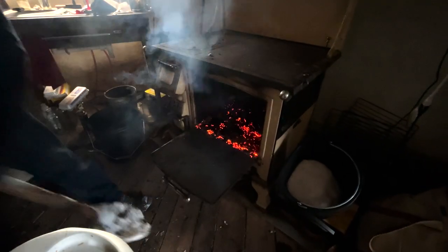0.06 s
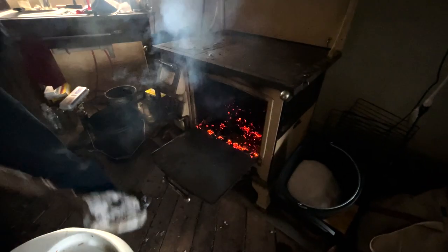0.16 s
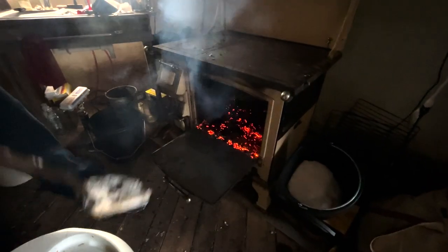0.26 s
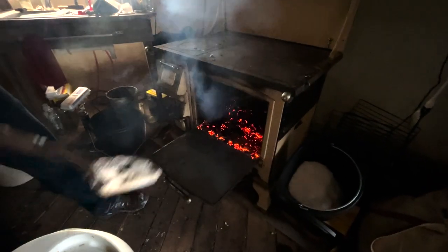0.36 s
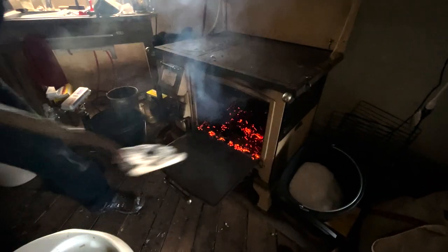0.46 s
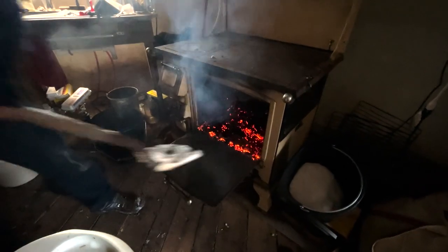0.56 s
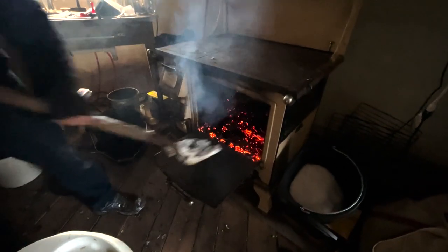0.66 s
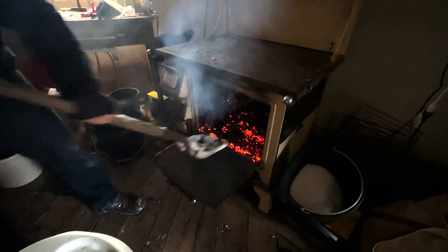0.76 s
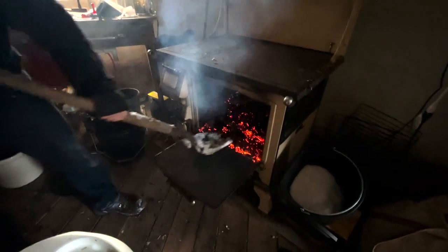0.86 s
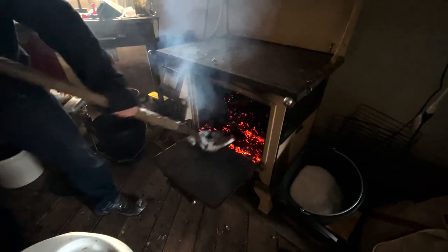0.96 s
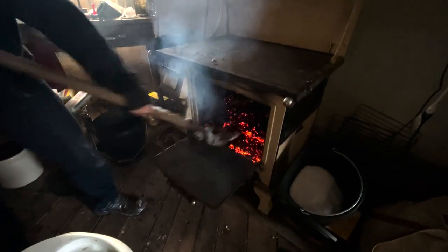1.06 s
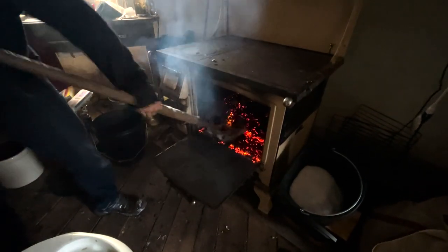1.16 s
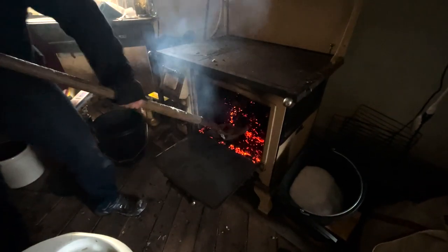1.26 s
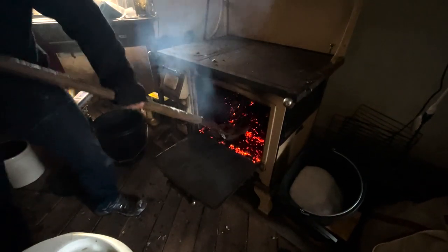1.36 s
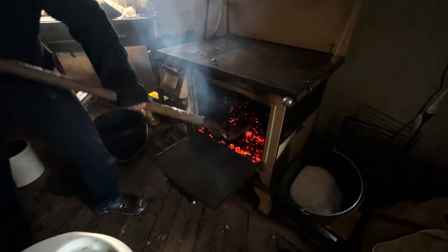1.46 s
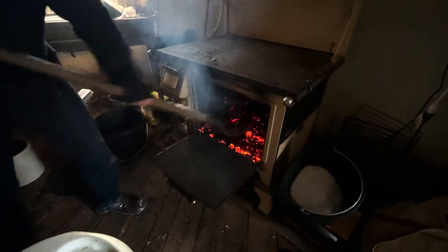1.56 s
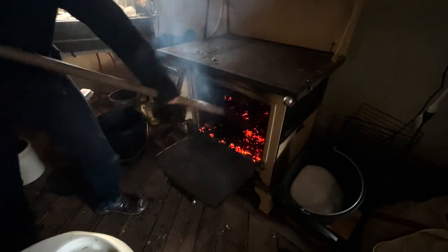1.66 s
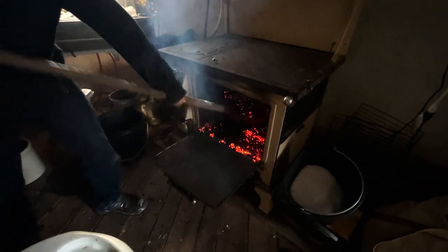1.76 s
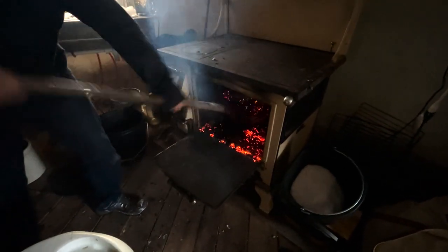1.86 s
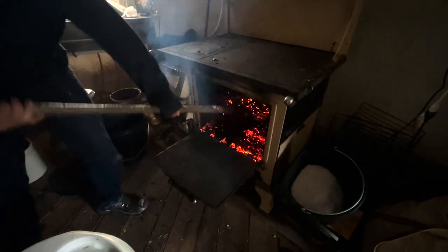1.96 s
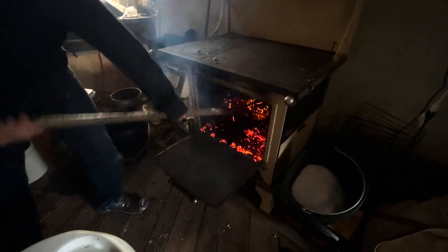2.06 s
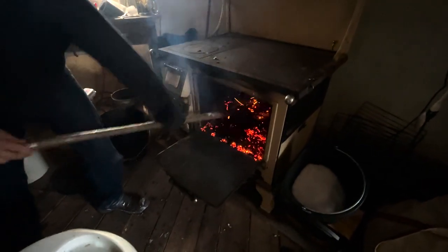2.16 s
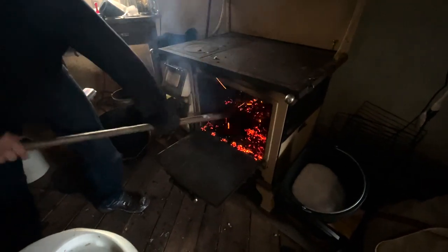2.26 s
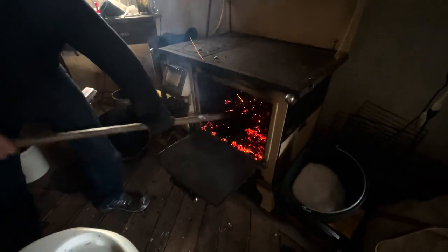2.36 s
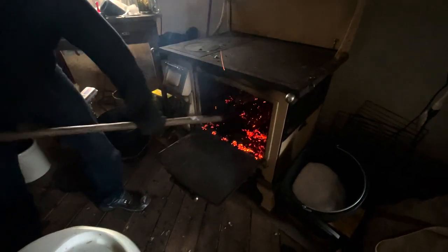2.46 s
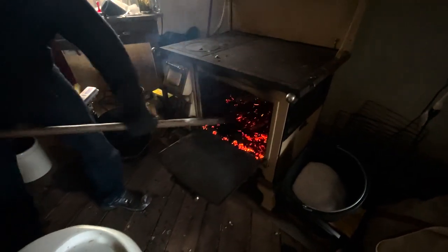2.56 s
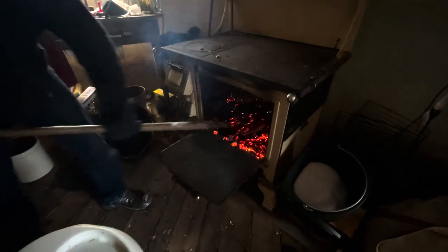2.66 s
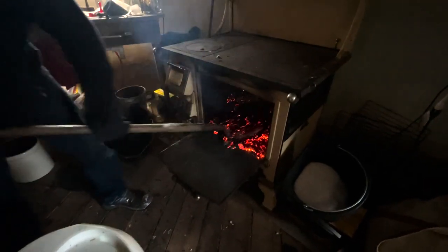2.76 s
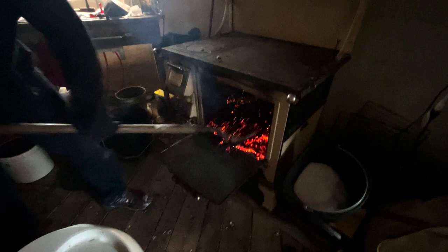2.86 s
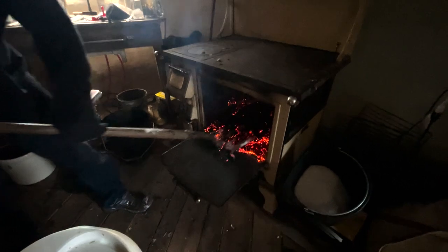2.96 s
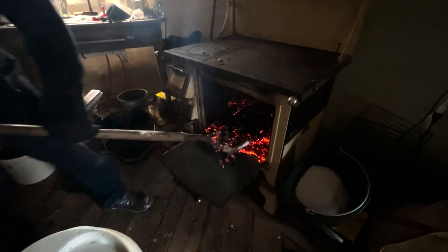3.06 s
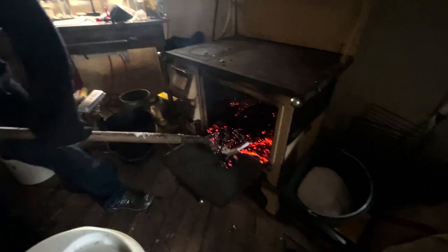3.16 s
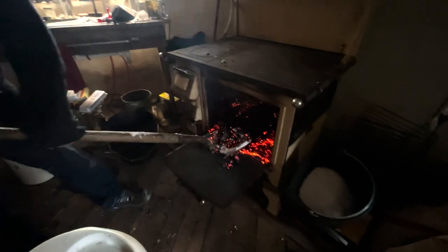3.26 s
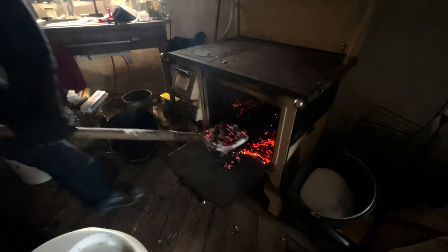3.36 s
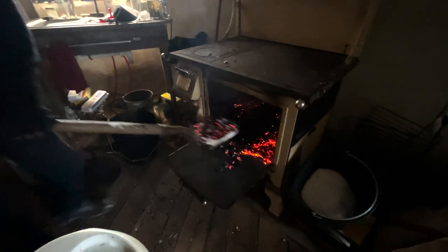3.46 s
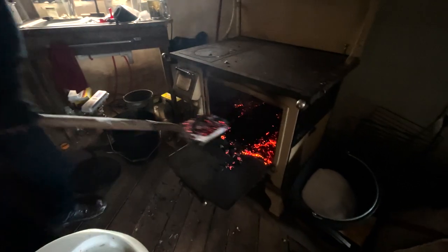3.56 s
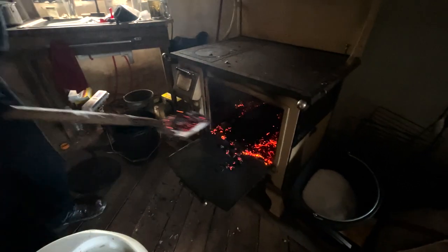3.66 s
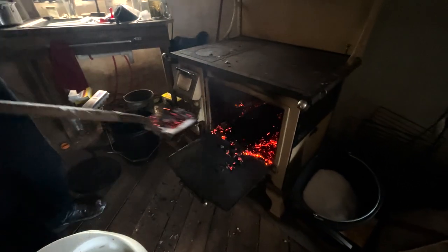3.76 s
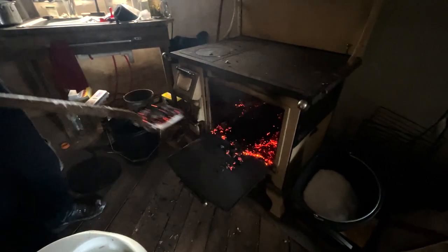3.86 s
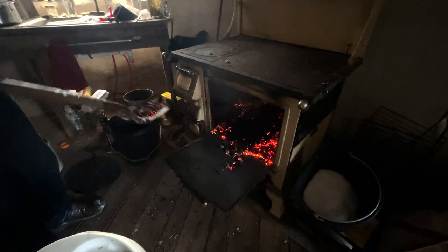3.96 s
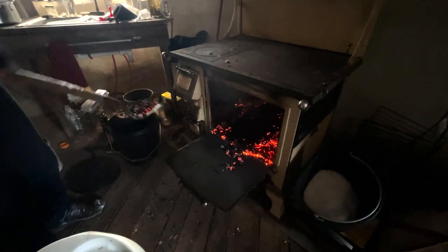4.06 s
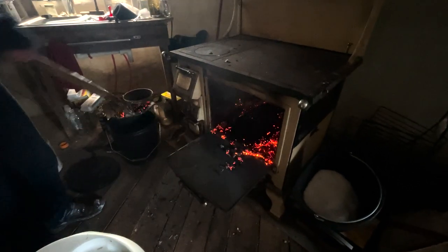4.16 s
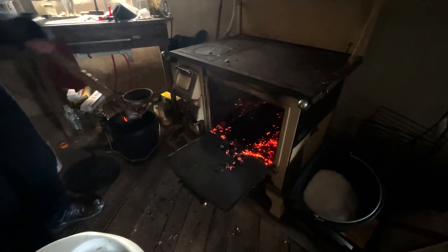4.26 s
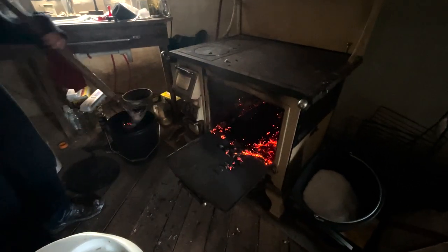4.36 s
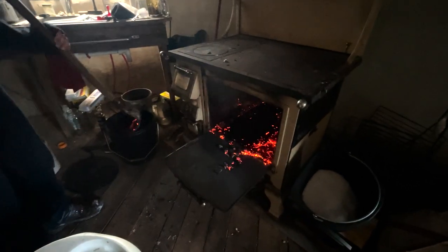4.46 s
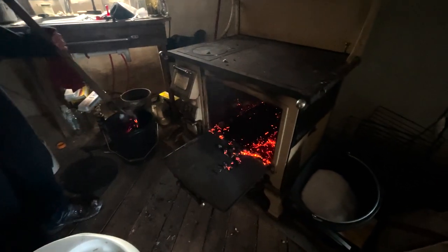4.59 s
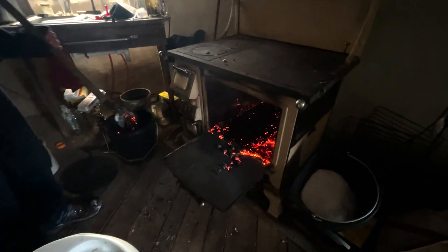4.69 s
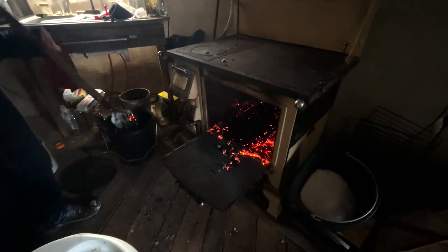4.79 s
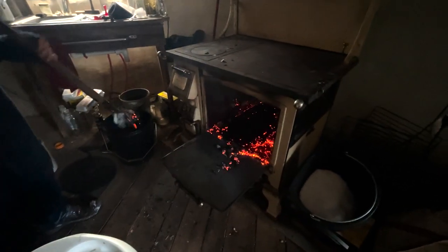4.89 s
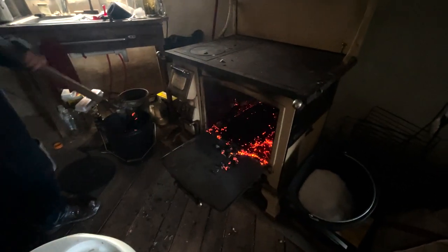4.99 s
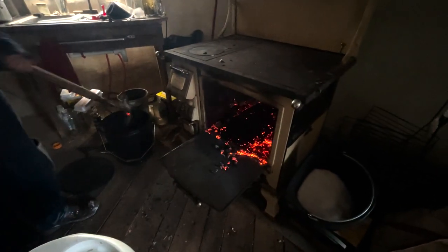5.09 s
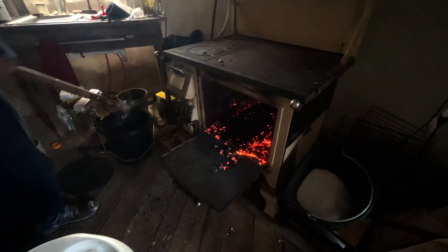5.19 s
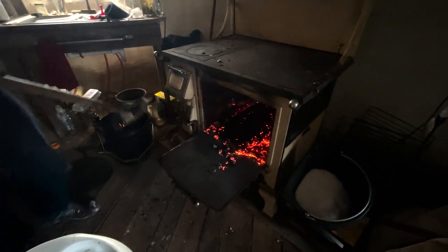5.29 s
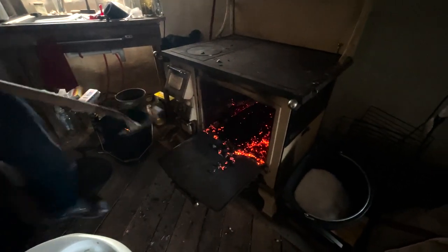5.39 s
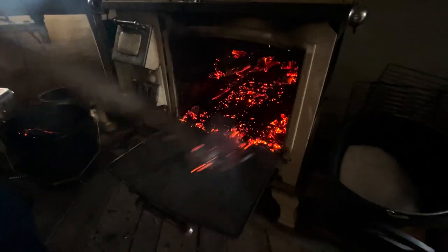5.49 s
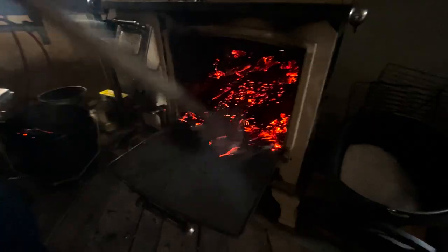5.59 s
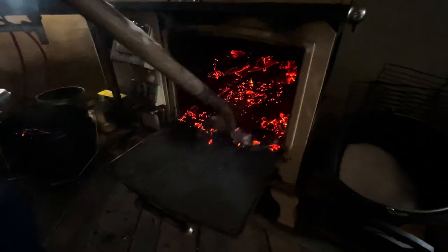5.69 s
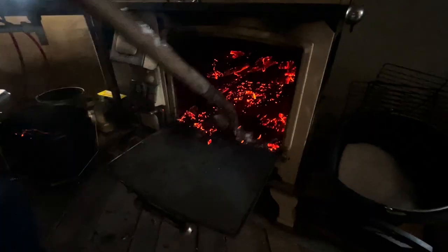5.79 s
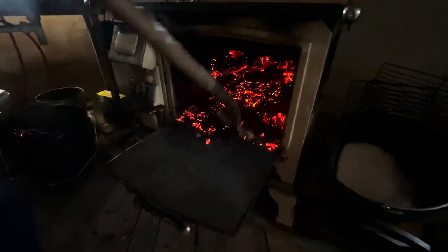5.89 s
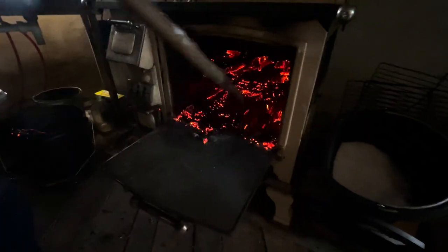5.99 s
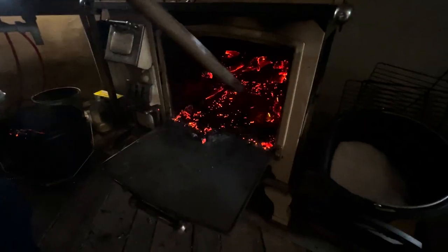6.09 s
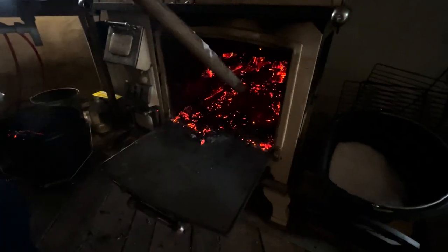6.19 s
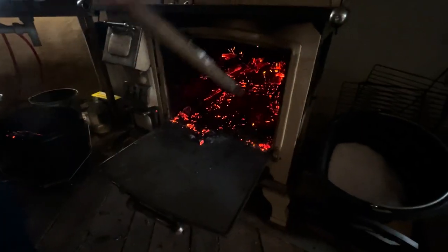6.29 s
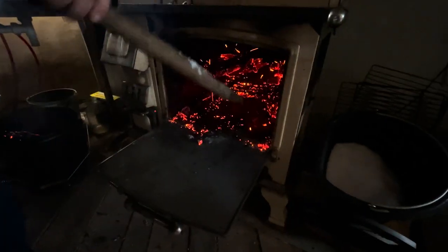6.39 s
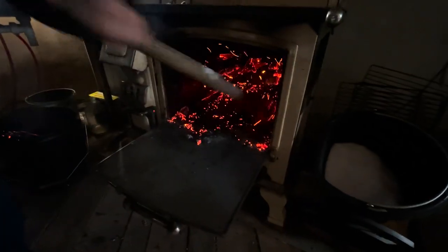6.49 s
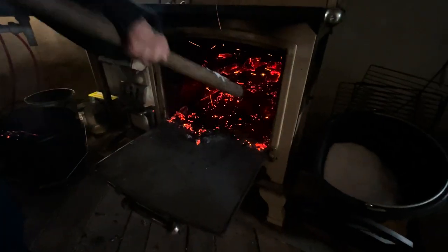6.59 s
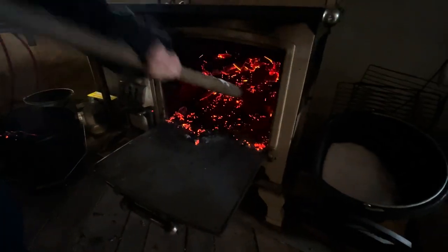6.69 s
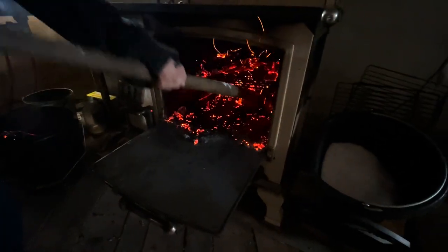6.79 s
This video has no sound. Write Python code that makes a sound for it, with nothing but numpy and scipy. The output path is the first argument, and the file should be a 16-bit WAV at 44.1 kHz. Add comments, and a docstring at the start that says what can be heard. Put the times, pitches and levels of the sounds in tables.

```python
"""A light brush and a few ember snaps, then a steel shovel scrapes over the sill of a wood stove,
digs into the burning coals and tips them into a metal bucket. Grit crunches under the blade and
rings the steel; the shovel's weight rumbles the firebox, and lumps knock and crush.
Heard from a close pair of microphone ports in a small wooden room that hums softly."""
import sys
import numpy as np
from scipy import signal
from scipy.io import wavfile

SR = 44100
rng = np.random.default_rng(int(sys.argv[2]) if len(sys.argv) > 2 else 0)


def wav_out(sig):
    """Save sig, one row per channel (or a flat mono array), as 16-bit PCM at SR to the path in sys.argv[1]."""
    wavfile.write(sys.argv[1], SR, np.round(np.clip(np.atleast_2d(sig).T, -1, 1) * 32767).astype(np.int16))


N = 301644

# Shovel strokes at the stove and bucket, one list each.
# Each row: time in seconds, scrape on the blade in dB, weight on the firebox or bucket in dB.
STROKES = [
    [(.618, -43, -34), (.64, -26.5, -39), (.69, -33.5, -34.5), (.73, -29.5, -33), (.88, -36, -42.5),
     (.97, -24.5, -30), (1.06, -27.5, -14), (1.14, -29, -34), (1.18, -25, -27.5), (1.25, -41, -39),
     (1.45, -39.5, -43.5)],
    [(1.47, -32, -46.5), (1.6, -16, -15), (1.63, -25, -26.5), (1.7, -25.5, -25), (1.74, -23, -16),
     (1.78, -26, -20.5), (1.96, -39, -28.5), (1.99, -29, -20.5), (2.05, -38.5, -24), (2.1, -42, -39),
     (2.23, -33.5, -19), (2.3, -36, -33), (2.41, -32, -29), (2.6, -39.5, -29), (2.67, -47, -44.5),
     (2.74, -41, -46)],
    [(2.76, -45.5, -46), (2.9, -35.5, -44.5), (3.07, -48.5, -49), (3.33, -53, -62)],
    [(4.367, -24, -26), (4.41, -26, -30.5), (4.45, -30.5, -28.5), (4.59, -42.5, -51), (4.63, -43, -50),
     (4.7, -33.5, -39.5), (4.76, -39, -45), (4.82, -34, -48), (4.87, -51.5, -41), (4.98, -57, -68)],
    [(5.486, -20.5, -35), (5.498, -14, -22.5), (5.52, -30, -33), (5.555, -36, -45), (5.606, -35, -25),
     (5.7, -43, -38.5), (5.86, -32, -30.5), (6.0, -24.5, -26.5), (6.06, -22.5, -16.5), (6.2, -47, -37.5),
     (6.26, -41, -30), (6.33, -45.5, -39)],
    [(6.344, -34, -12.5), (6.41, -33.5, -23.5), (6.49, -19, -15), (6.59, -33.5, -23), (6.72, -28.5, -20),
     (6.77, -47, -34), (6.84, -21, -17.5)],
]
# Shovel and boots brush lightly between strokes.
# Each row: start, rise and hold in seconds, scrape in dB, weight in dB.
BRUSHES = [(0, 0.0017, 0.11, -46.5, -57), (0.326, .05, .02, -56.5, -51), (3.385, 0.049, 0.034, -43, -51),
           (3.699, 0.012, .03, -44, -56), (4.295, 0.015, 0.082, -43.5, -57.5),
           (5.17, 0.042, 0.026, -58, -57)]
BRUSH_RISE_DB, RELEASE_DB_PER_S = 15.5, 206


def shovel_effort():
    """Scrape and weight in dB: each stroke or brush lands, runs its course and dies; the loudest rules."""
    brushes = [[(start, scrape - BRUSH_RISE_DB, weight - BRUSH_RISE_DB),
                (start + rise, scrape, weight), (start + rise + hold, scrape, weight)]
               for start, rise, hold, scrape, weight in BRUSHES]
    t, effort_db = np.arange(N) / SR, np.full((2, N), -120.)
    for move in STROKES + brushes:
        fade_db = RELEASE_DB_PER_S * np.maximum(t - move[-1][0], 0) + 200 * (t < move[0][0])
        effort_db = np.maximum(effort_db, np.array(in_time(move)) - fade_db)
    return effort_db


# Modes of the shovel blade and the bucket wall. Each row: pitch in Hz, width in Hz, level in dB.
BLADE_MODES = [(601, 54, 1.5), (700, 70, 0.5), (818, 86, 0.5), (877, 28.4, -4), (930, 46, 0.5),
               (1034, 42, 0.5), (1150, 45, -2), (1283, 46, -0.5), (1402, 330, 3.5), (1666, 157, 2),
               (1764, 157, 1.5), (1973, 17, -5.5), (2150, 130, -18.5)]
BUCKET_MODES = [(785, 95, 2), (1040, 290, 17.5), (1990, 110, 7), (2260, 52, -15), (2480, 210, 11.5),
                (3370, 61, -30), (4030, 98, -12.5), (5400, 230, 6)]


def blade_and_bucket(scrape_db, bucket_share):
    """Fine grit and knocks ring the steel blade and, by its share, the bucket."""
    knocking = knock_envelope(BLADE_DB, trim_db=-0.5, t60_scale=1)
    scrape = grains(4000, 2.57, 1.1) * (from_db(scrape_db) + knocking)
    blade = ring(scrape, BLADE_MODES, spread=0.47, wander_db=4, knock_column=BLADE_DB, knock_db=-5.5)
    bucket = ring(scrape, BUCKET_MODES, spread=0.56, wander_db=6, knock_column=BLADE_DB, knock_db=6.5)
    return (1 - bucket_share) * blade + bucket_share * bucket


# Hard blows. Each row: start in seconds, level in dB, pitch rung hardest in Hz, crack of grit in dB.
BLOWS = [(.3835, -34, 106, -64), (.6261, -24.5, 345, -37), (.7694, -17, 930, -34), (.9734, -14.5, 589, -18),
         (1.0573, -3, 222, -11), (1.5935, -3.5, 274, -29.5), (1.72, -6, 217, -14.5),
         (1.7336, -10.5, 320, -18), (1.9784, -24, 330.4, -37), (2.044, -15, 129, -45),
         (2.2074, -20, 400, -24), (2.478, -21, 385, -58), (2.5606, -17.5, 784, -27),
         (2.581, -18, 1490, -21.5), (4.3681, -10, 1990, -13), (4.4286, -11.5, 159, -47),
         (4.475, -26, 169, -47), (4.621, -25.5, 139, -43), (4.673, -25, 169, -30),
         (4.7712, -20.5, 1140, -24), (4.8492, -26.5, 400, -55), (5.5027, -7.5, 890, -22),
         (5.591, -0.5, 840, -3.5), (5.604, -10.5, 173, -40), (5.7876, -23.5, 615, -16.5),
         (6.0599, -5, 355, -37), (6.3441, -8.5, 590, -51), (6.4534, -14, 463, -23),
         (6.6485, -7.5, 336, -22), (6.793, -13.5, 340, -16), (6.8344, -6, 324, -21)]
# Coal lumps crush; embers snap, too light to move the iron.
# Each row: start in seconds, level in dB, nominal time to fall 60 dB in seconds.
COAL_CRUNCHES = [(.6988, -23.5, 0.39), (1.0169, -16, 0.089), (1.8437, -17, 0.064), (2.1197, -24, 0.096),
                 (2.405, -17, 0.038), (2.7793, -32, .18), (3.698, -35, 0.072), (4.2945, -42.5, 0.24),
                 (4.488, -28.5, 0.1), (4.546, -32.5, 0.16), (4.6264, -26.5, 0.26), (4.81, -28.5, 0.052),
                 (5.567, -15.5, 0.1), (5.748, -19.5, 0.021), (5.764, -30, 0.01), (5.889, -19.5, 0.013),
                 (5.9167, -10.5, 0.066), (5.938, -17, 0.0095), (6.6216, -20, .24)]
EMBER_SNAPS = [(0.2, -48, 0.018), (.361, -51, .05), (0.415, -42, 0.075), (.4426, -39.5, .093),
               (4.043, -37.5, 0.047), (4.123, -35.5, 0.024), (4.928, -36.5, 0.1), (4.997, -43, 0.24),
               (5.05, -50, .05), (5.225, -47.5, .04)]
CRUNCH_FIREBOX_DB, CRUNCH_BLADE_DB, CRUNCH_PITCH_HZ = -28.5, -3, 405
BLOW_T60_S, SPLIT_HZ = 0.017, 470  # lower blows land on the firebox, higher ones on the blade
BLADE_LOSS_DB_PER_OCT, FIREBOX_LOSS_DB_PER_OCT = 6.5, 15
BOOM_SPLIT_HZ, BOOM_LOSS_DB_PER_OCT = 285, 8  # knocks above this pitch stir the boom less
START_S, GRIT_DB, FIREBOX_DB, BLADE_DB, T60_S, PITCH_HZ, BOOM_DB = range(7)  # columns of knocks()


def knocks():
    """Every crunch, snap and blow, with its force shared among grit, firebox, blade and boom."""
    rows = [(start, db, db + CRUNCH_FIREBOX_DB, db + CRUNCH_BLADE_DB, t60, CRUNCH_PITCH_HZ)
            for start, db, t60 in COAL_CRUNCHES]
    rows += [(start, db, -200, -200, t60, CRUNCH_PITCH_HZ) for start, db, t60 in EMBER_SNAPS]
    for start, db, hz, crack_db in BLOWS:
        octaves = np.clip(np.log2(hz / SPLIT_HZ), -1, 2)
        firebox_db = db - FIREBOX_LOSS_DB_PER_OCT * max(octaves, 0)
        blade_db = db + BLADE_LOSS_DB_PER_OCT * min(octaves, 0)
        rows.append((start, crack_db, firebox_db, blade_db, BLOW_T60_S, hz))
    rows = np.array(rows)
    boom_loss_db = BOOM_LOSS_DB_PER_OCT * np.log2(rows[:, PITCH_HZ] / BOOM_SPLIT_HZ).clip(0)
    return np.column_stack([rows, rows[:, FIREBOX_DB] - boom_loss_db])


def knock_envelope(column, trim_db, t60_scale):
    """Each knock is a sudden force that dies away exponentially."""
    force, t = np.zeros(N), np.arange(SR // 4) / SR
    for hit in knocks():
        at = round(hit[START_S] * SR)
        t60 = np.clip(hit[T60_S] * t60_scale, .004, 1)
        force[at:at + len(t)] += from_db(hit[column] + trim_db - 60 * t / t60)[:N - at]
    return force


# The stove's firebox: the boom of its air and floor, then its iron walls.
# Each row: pitch in Hz, width in Hz, level in dB.
BOOM_MODES = [(90.2, 14, 1), (105.7, 14, -1), (150.6, 43, 6.5), (181.7, 16.4, 2.5), (216.3, 37, -2)]
IRON_WALL_MODES = [(336.8, 42.5, 1), (348.6, 31.5, 4.5), (378.5, 37, -3), (411.4, 23.6, -3),
                   (461, 54, -3.5), (574, 11.5, -14.5)]


def firebox(weight_db, boom_db, tilt_db):
    """Coarse contacts under the shovel's weight shake the heavy iron."""
    lumps = grains(700, 2.98, 2.65)
    heave = from_db(weight_db + boom_db) + knock_envelope(BOOM_DB, trim_db=-3.5, t60_scale=1.6)
    thud = from_db(weight_db) + knock_envelope(FIREBOX_DB, trim_db=-0.5, t60_scale=0.75)
    boom = ring(lumps * heave, BOOM_MODES, spread=0.051, wander_db=1.5,
                knock_column=FIREBOX_DB, knock_db=-4.5, tilt_db=tilt_db)
    walls = ring(lumps * thud, IRON_WALL_MODES, spread=0.21, wander_db=3.5,
                 knock_column=FIREBOX_DB, knock_db=-7.5)
    return boom + walls


# The colour of coal grit, close up. Each row: frequency in Hz, spectral density in dB.
GRIT_SPECTRUM = [(1060, -30), (1800, -3), (2350, -2.5), (3040, 1.5), (6360, -3.5), (7950, -9),
                 (12600, -2.5), (14000, -21)]
# Small rings in the grit. Each row: pitch in Hz, width in Hz, level in dB.
GRIT_MODES = [(3040, 220, -12), (3590, 120, -12), (4150, 140, -12), (4540, 130, -13), (5070, 130, -14),
              (5990, 130, -16)]


def grit(grit_db, tilt_db):
    """Coal crumbs crush under the blade: dense clicks, a broad colour and a few small rings."""
    level = from_db(grit_db) + knock_envelope(GRIT_DB, trim_db=-5.5, t60_scale=1.31)
    clicks = np.array([grains(6000, 1.5, 1.8) for _ in range(2)])
    hits, cracks = knocks(), np.zeros(N)
    cracks[np.round(hits[:, START_S] * SR).astype(int)] = from_db(hits[:, GRIT_DB] + 3)
    force = clicks * level + cracks
    # A near reflection and unrelated scatter reach the two ports in opposite sense.
    reflection = 0.47 * np.pad(force, ((0, 0), (23, 0)))[:, :N]
    side = reflection + 1.59 * level * grains(6000, 3.1, 0.66)
    ports = np.stack([force + side, force - side], axis=1)
    power = sum(np.mean(band ** 2) for _, band in bands(clicks[:, :SR], GRIT_SPECTRUM, 1800, count=6))
    crunch = sum(from_db(1.68 * drift(23) + tilt_db * np.log2(hz / 4500)) * band
                 for hz, band in bands(ports, GRIT_SPECTRUM, 1945, count=6))
    rings = ring(force[0], GRIT_MODES, spread=0.62, wander_db=6)
    return 0.73 * crunch / np.sqrt(power) + from_db(-10.5) * rings


# Rubs that sing or squeak. Each row: start and fade length in seconds, pitch and width in Hz,
# level in dB, left over right in dB.
SINGING_RUBS = [(0.63, 0.19, 331, 9.9, -25, -2), (0.632, 0.05, 1269, 40, -23, 2),
                (0.703, 0.064, 1250, 28, -24, 0), (0.845, 0.26, 920, 28, -55, 2),
                (1.08, 0.34, 155.4, 5.2, -29.5, 1.5), (2.032, 0.36, 105, 28, -21.5, 2.5),
                (2.956, 0.33, 1297, 25, -45.5, 4), (5.723, 0.27, 3280, 92, -39, 2),
                (5.846, 0.55, 388, 7.7, -27.5, -3), (6.048, 0.049, 7770, 500, -18, -4),
                (6.342, 0.037, 712, 102, -10, 4), (6.13, 0.044, 697, 57, -24, 4),
                (6.466, 0.27, 440, 78, -15, -2.5), (6.489, 0.052, 7820, 140, -22, -3)]


def singing_rubs():
    """Stick and slip: a rough, fading rub of up to half a second drives one narrow mode."""
    out, t = np.zeros((2, N)), np.arange(SR // 2) / SR
    slip = from_db(2.25 * drift(61))
    for start, length, hz, width, db, pan_db in SINGING_RUBS:
        at = round(start * SR)
        fade = (t < length) * from_db(-15 * t / length)
        rub = rms_one(resonance(rng.standard_normal(len(t)), hz, 3 * width)) * fade
        tone = resonance(rub[:N - at] * slip[at:at + len(t)], hz, width) * np.sqrt(width / SR) * 3
        out[:, at:at + len(t)] += tone * from_db(db + np.array([[pan_db], [-pan_db]]) / 2)
    return out


# The shovel before the microphones: floor, sill, coal bed, drawn out, carried across, bucket,
# swung back, coal bed close by. Each row: arrival and right port's lag in seconds, left over right
# in dB, bucket share from 0 to 1, grit over scrape in dB, grit tilt in dB per octave,
# boom over weight in dB, boom tilt in dB per octave, ember hiss in dB.
SHOVEL_PLACES = [(0, 0.00039, 0, 0, -6.5, 2.6, 4.5, -2, -7.5),
                 (.6, 0.000067, -1.5, 0.06, -3, -0.6, -5, 17, -11.5),
                 (1.47, 0.000071, -1, 0, -3.5, 0.7, -1.5, -2, 11),
                 (2.75, 0.000056, -2, 0.2, -1, -1.1, -5.5, 6, 2),
                 (3.4, 0.00052, -1.5, 0.11, -5.5, 5, 4, 1.5, 0),
                 (4.35, 0.00046, -1.7, 0.62, -5.5, -3.5, 1.5, 8.5, 1.3),
                 (5.05, 0.00061, 0, 0.4, -3.5, 0, 2.5, -1, -2),
                 (5.481, 0.000017, -2, 0.25, 0, 1.5, -4.5, 6, -5.5)]
MOVE_S = 0.13


def shovel_path():
    """The shovel stays at each place, then glides to the next."""
    rows = [SHOVEL_PLACES[0]]
    for here, there in zip(SHOVEL_PLACES, SHOVEL_PLACES[1:]):
        rows += [(there[0] - MOVE_S, *here[1:]), there]
    return in_time(rows)


ROOM_T60_S, WALL_CUT_HZ, BASS_LEAK_HZ = 0.2, 3100, 221


def wooden_room(direct):
    """Thin planks let the bass out; the rest echoes in four loops a side, duller on every round."""
    trapped = signal.sosfilt(signal.butter(2, BASS_LEAK_HZ, "high", fs=SR, output="sos"), direct)
    echoes, dull = np.zeros((2, N)), np.exp(-2 * np.pi * WALL_CUT_HZ / SR)
    for k, lag in enumerate((rng.uniform(0.0097, 0.021, size=8) * SR).astype(int)):
        loop, state = trapped.copy(), [0.]
        gain = from_db(-60 * lag / SR / ROOM_T60_S)
        for i in range(lag, N, lag):
            back, state = signal.lfilter([gain * (1 - dull)], [1, -dull], loop[i - lag:i], zi=state)
            loop[i:i + lag] += back[:N - i]
        echoes[k % 2] += (loop - trapped) * (-1) ** (k // 2)
    return echoes


# The room's hum around the microphones. Each row: frequency in Hz, spectral density in dB.
HUM_SPECTRUM = [(12, -37), (20, -31), (48, 4.5), (81, 5), (286, -20), (397, -10.5), (599, -24),
                (1160, -23.5), (1950, -23.5), (2360, -26.5), (8320, -26), (11900, -26.5), (14000, -51)]
# How alike the two ports hear it. Each row: frequency in Hz, left-right correlation from 0 to 1.
PORT_LIKENESS = [(30, 0.97), (250, 0.81), (700, 0.15), (2000, 0.1), (14000, 0.13)]
ROOM_TONE_DB = -49


def room_tone(hiss_db):
    """Fire draught and house hum, alike at both ports in the bass only; embers hiss in the treble."""
    tone = 0
    for hz, (mid, side) in bands(rng.standard_normal((2, 2, N)), HUM_SPECTRUM, 27.77, count=18):
        alike = at_hz(PORT_LIKENESS, hz)
        gain = from_db(0.94 * drift(5.7) + hiss_db * (hz > 2400))
        tone += gain * (np.sqrt(1 + alike) * mid + np.sqrt(1 - alike) * side * [[1], [-1]])
    return from_db(ROOM_TONE_DB) * rms_one(tone)


def ring(force, modes, spread, wander_db, knock_column=None, knock_db=0, tilt_db=0):
    """A moving contact drives a body's modes unevenly; knocks favour the modes near their pitch."""
    out, hits = 0, knocks()
    at = np.round(hits[:, START_S] * SR).astype(int)
    middle_hz = modes[len(modes) // 2][0]
    for k, (hz, width, db) in enumerate(modes):
        drive = force * from_db(db + wander_db * drift(13.8) + tilt_db * np.log2(hz / middle_hz))
        if knock_column:
            octaves = np.abs(np.log2(hz / hits[:, PITCH_HZ])).clip(0, 1.8)
            drive[at] += from_db(hits[:, knock_column] + knock_db - 14.3 * octaves) * np.sqrt(SR / width)
        lean = spread * (-1) ** (k // 2)  # each mode radiates more toward one port
        out += (-1) ** k * resonance(drive, hz, width) * np.array([[1 + lean], [1 - lean]])
    return out / np.sqrt(np.sum(from_db(np.array(modes)[:, 2]) ** 2) * (1 + spread ** 2))


def resonance(x, hz, width):
    """One mode; white noise of rms 1 comes out near rms 1."""
    r = np.exp(-np.pi * width / SR)
    poles = [1, -2 * r * np.cos(2 * np.pi * hz / SR), r * r]
    return signal.lfilter([1, 0, -1], poles, x) * np.sqrt((1 - r * r) / 2)


def grains(per_s, spread_db, clump_db):
    """Random contacts of uneven size that come in clumps; rms 1."""
    sizes = from_db(spread_db * np.minimum(rng.exponential(1, N), 4)) * rng.choice([-1, 1], N)
    contacts = rng.random(N) < per_s / SR
    return rms_one(sizes * contacts * from_db(clump_db * drift(21)) + 1e-9)


def drift(rate_hz):
    """Slow random wander; rms 1."""
    r = np.exp(-40 * np.pi * rate_hz / SR)  # one step every 20 samples
    slow = signal.lfilter([1], [1, -2 * r, r * r], rng.standard_normal(N // 20 + 2002))[2000:]
    return np.interp(np.arange(N) / 20, np.arange(len(slow)), rms_one(slow))


def bands(pair, spectrum, low_hz, count):
    """Yield (centre Hz, half-octave band at its level), taken from two signals in turn."""
    for k in range(count):
        low = low_hz * 2 ** (k / 2)
        hz = low * 2 ** .25
        sos = signal.butter(2, [low, min(low * np.sqrt(2), 15500)], "band", fs=SR, output="sos")
        yield hz, from_db(at_hz(spectrum, hz)) * signal.sosfilt(sos, pair[k % 2])


def at_hz(points, hz):
    """Read a spectrum table on a log-frequency axis."""
    freqs, values = np.transpose(points)
    return np.interp(np.log(hz), np.log(freqs), values)


def in_time(rows):
    """Columns of a table as curves over every sample."""
    times, *columns = np.transpose(rows)
    return [np.interp(np.arange(N) / SR, times, column) for column in columns]


def from_db(db):
    """Gain of a level in dB."""
    return 10 ** (np.asarray(db) / 20)


def rms_one(x):
    """Scale to rms 1."""
    return x / np.sqrt(np.mean(x ** 2) + 1e-20)


def scene():
    """Rubbing and knocks drive firebox, blade, bucket and grit; the room answers."""
    scrape_db, weight_db = shovel_effort()
    lag_s, pan_db, bucket_share, grit_db, grit_tilt_db, boom_db, boom_tilt_db, hiss_db = shovel_path()
    direct = firebox(weight_db, boom_db, boom_tilt_db) + blade_and_bucket(scrape_db, bucket_share)
    direct += grit(scrape_db + grit_db, grit_tilt_db) + singing_rubs()
    direct *= from_db(np.array([pan_db, -pan_db]) / 2)
    direct[1] = np.interp(np.arange(N) - SR * lag_s, np.arange(N), direct[1])
    return direct + from_db(-9) * wooden_room(direct.mean(axis=0)) + room_tone(hiss_db)


PORT_STOP_HZ, TOP_STOP_HZ = 14200, 16400


def record(dry):
    """The microphone ports ring broadly near 8 kHz, peaks are rounded and the top treble is cut."""
    rounded = np.tanh(dry + 0.28 * resonance(dry, hz=8330, width=1334))
    dulled = signal.sosfilt(signal.cheby2(8, 30, PORT_STOP_HZ, fs=SR, output="sos"), rounded)
    return signal.sosfilt(signal.cheby2(12, 70, TOP_STOP_HZ, fs=SR, output="sos"), dulled)


dry = scene()
out = record(dry)
wav_out(out)
```